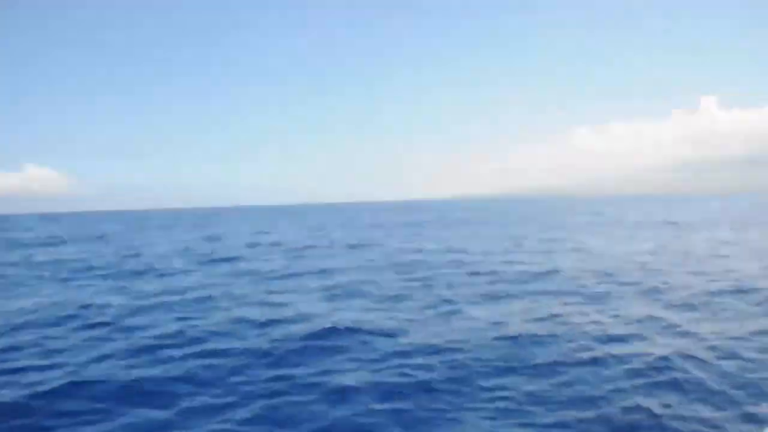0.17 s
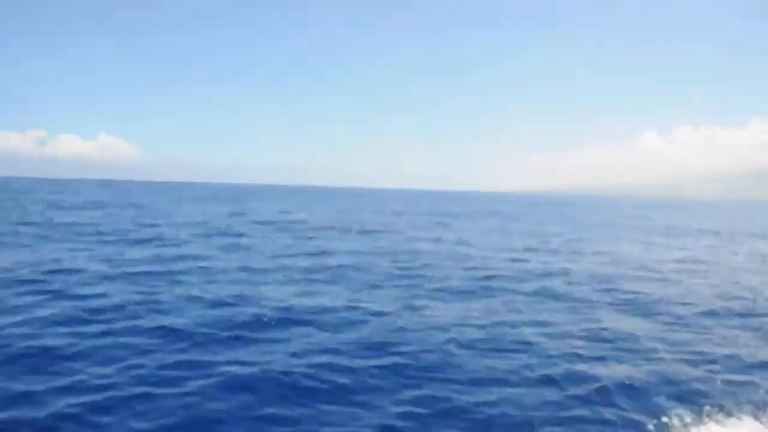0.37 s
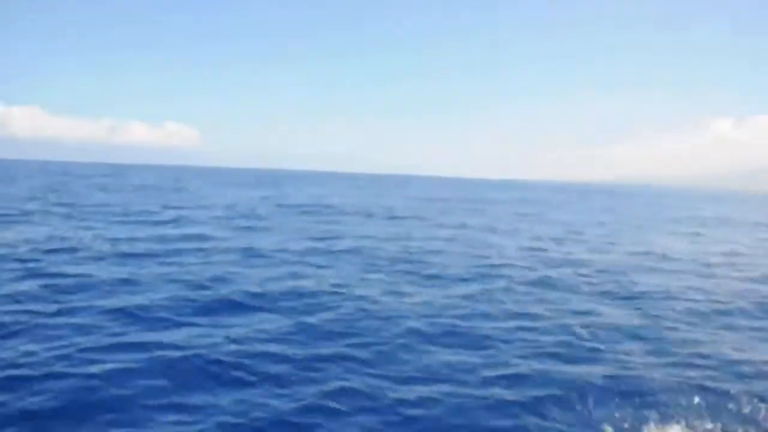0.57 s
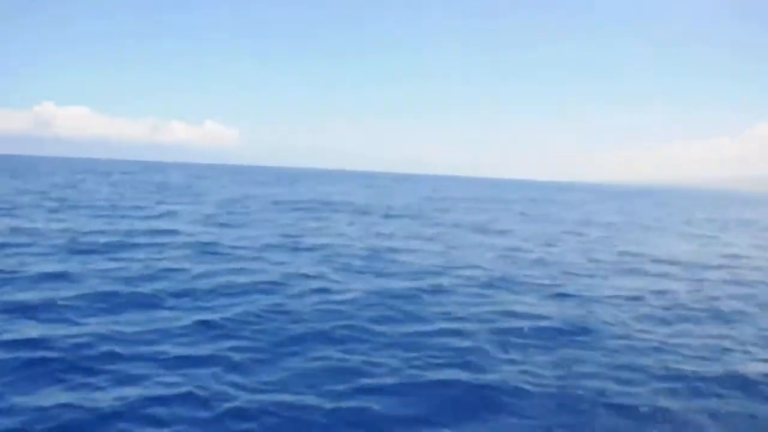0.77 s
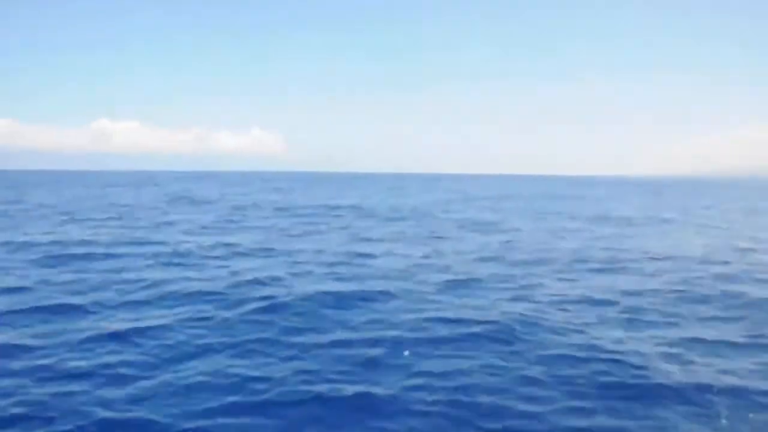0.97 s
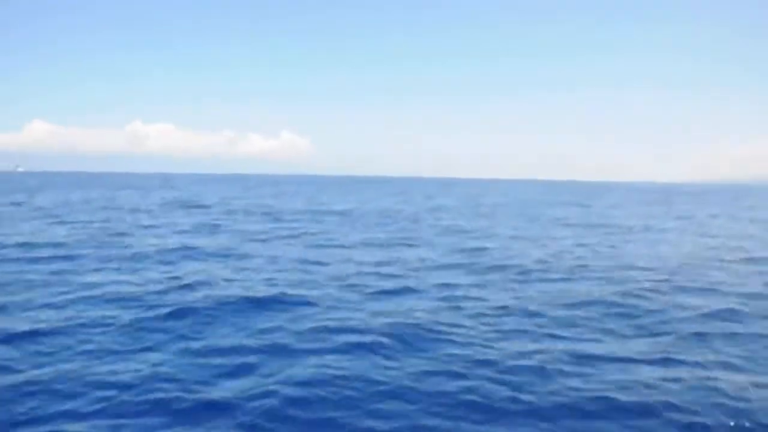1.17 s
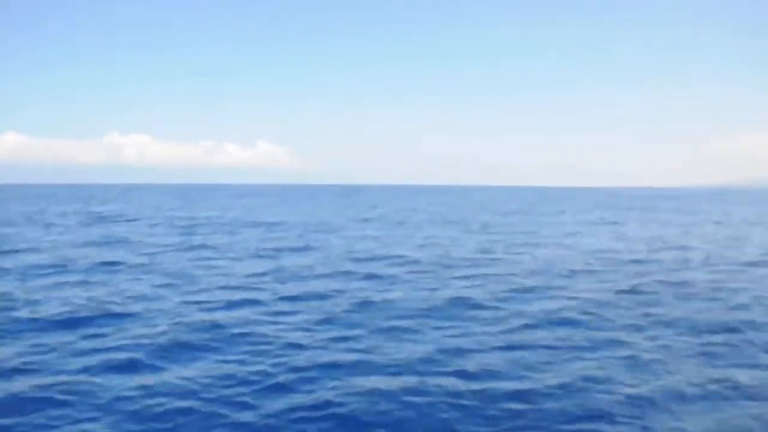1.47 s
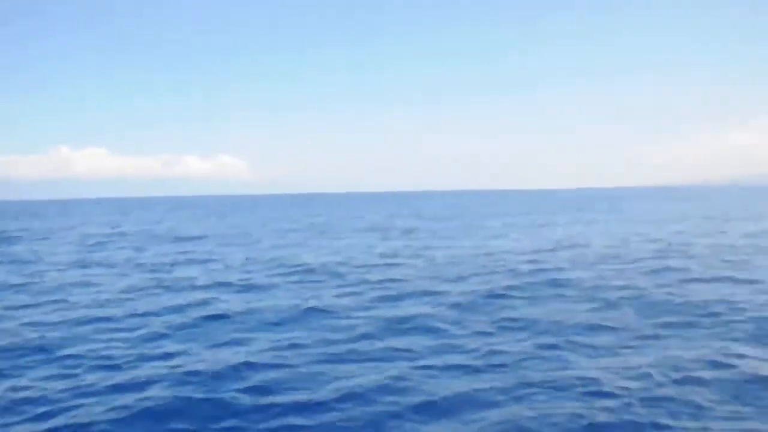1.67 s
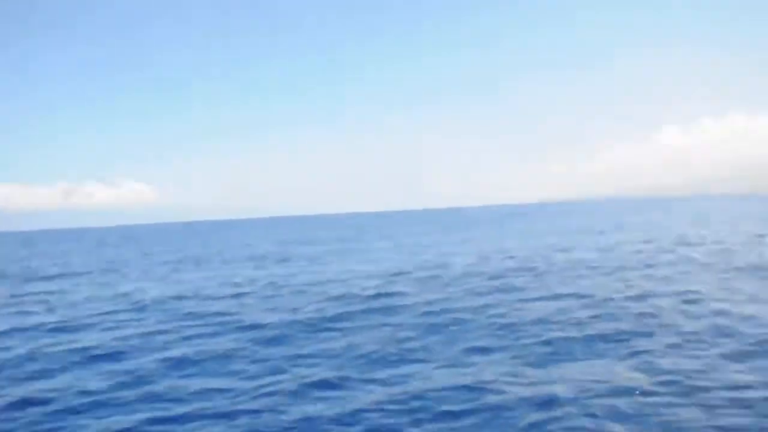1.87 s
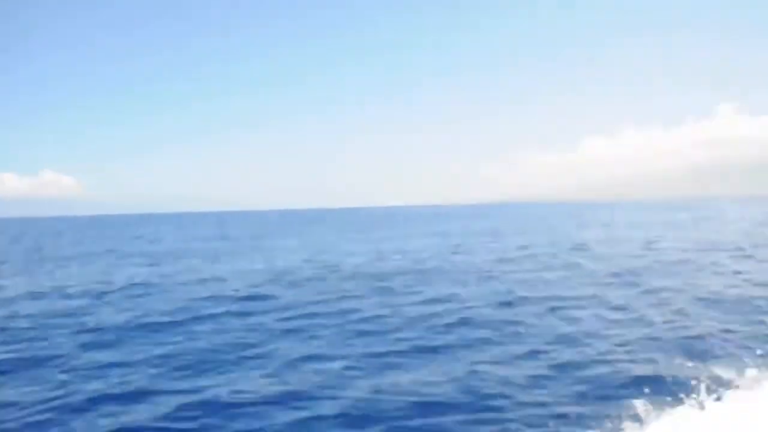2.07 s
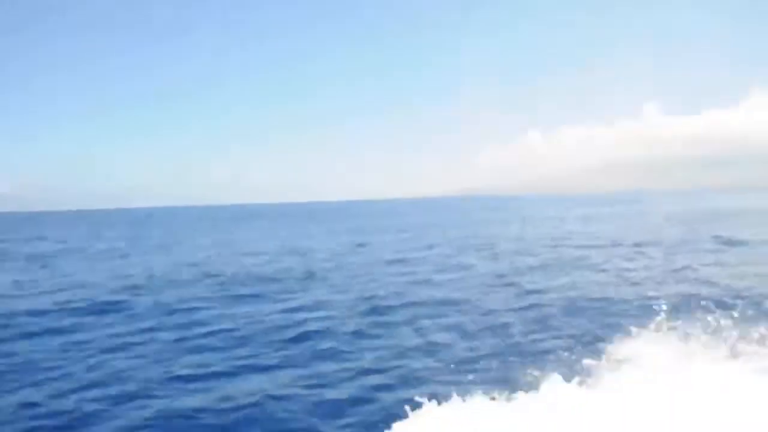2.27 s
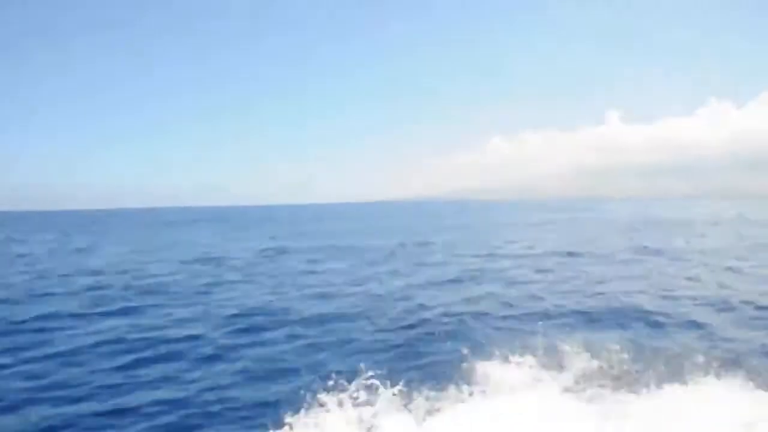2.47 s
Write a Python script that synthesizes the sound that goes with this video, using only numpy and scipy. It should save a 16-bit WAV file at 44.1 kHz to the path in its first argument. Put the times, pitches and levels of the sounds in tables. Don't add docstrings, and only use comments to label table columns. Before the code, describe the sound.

An outboard engine drones at steady fast throttle on a small boat, with spray hissing alongside

```python
import sys
import numpy as np
from scipy import signal
from scipy.fft import rfft, irfft
from scipy.io import wavfile
from scipy.ndimage import uniform_filter1d

SR = 44100
rng = np.random.default_rng(int(sys.argv[2]) if len(sys.argv) > 2 else 0)


def invert_db(x):
    u = np.asarray(x, float) / 20
    return 10 ** u


def master(y):
    cut = np.clip(np.atleast_2d(y).T, -1, 1)
    pcm = np.round(cut * 32767)
    wavfile.write(sys.argv[1], SR, pcm.astype(np.int16))


N = 115542

# start_s [s], cycle_rate_hz [Hz], load_db [dB], hull_ring_db [dB]
ENGINE_RIDE = [(0.0, 42.03, -31.5, -33), (0.04, 43.02, -17, -35.5), (0.2, 43.02, -16.5, -26),
               (0.36, 43.14, -18, -37), (0.38, 42.93, -20.5, -22.5), (1.33, 42.94, -21.5, -24),
               (1.48, 43.15, -17, -27.5), (1.56, 43.0, -14, -41), (1.58, 42.8, -24, -24.5),
               (1.76, 42.93, -16.5, -27.5), (1.82, 43.2, -20.5, -16.5), (1.85, 43.35, -11, -37),
               (1.88, 43.3, -15.5, -18), (2.06, 43.34, -21, -22), (2.11, 43.57, -13, -17.5),
               (2.3, 43.36, -26, -36), (2.33, 43.3, -20, -14), (2.62, 42.4, -18.5, -35)]
# cycle_multiple [x cycle rate], level_db [dB]
ENGINE_ORDERS = [(1, -29), (2, -12.5), (3, -13), (4, -27), (5, -4.5), (6, 3.5), (7, -9), (8, -5.5),
                 (9, -16.5), (10, -17), (11, -12), (12, -12), (13, -15), (14, -12), (15, -9), (16, -19.5),
                 (17, -31.5), (18, -12.5), (19, -25.5), (20, -14), (21, -34),
                 (5.5, -13), (7.5, -18), (8.5, -14), (20.4, -18.5), (21.1, -17), (25.9, -15.5), (28, -19.5),
               (34.1, -21.5), (35.2, -27)]
# pitch_hz [Hz], level_db [dB per Hz]
ROAR_COLOUR = [(40, -28), (76, -14), (160, -15), (235, 2.5), (280, -5.5), (340, -2), (420, -9), (700, -13),
               (1300, -44)]
# start_s [s], level_db [dB]
SPRAY_SWELLS = [
    (0.0, -28),
    (0.07, -24),
    (0.46, -24.5),
    (0.71, -21),
    (1.95, -23),
    (1.98, -25.5),
    (2.44, -22),
    (2.62, -24),
]
# pitch_hz [Hz], level_db [dB per Hz]
SPRAY_COLOUR = [(400, -19.5), (650, -1.5), (900, 0), (1500, -3.5), (2200, -11.5), (3500, -15),
                (4500, -22.5), (6200, -59)]
# pitch_hz [Hz], level_db [dB per Hz]
WIND_COLOUR = [(20, -22), (45, -17), (70, 3.5), (120, 17.5), (200, -6.5), (400, -49)]
# start_s [s], jump_height [signed, full scale 1]
STUTTER_JUMPS = [
    (.2490, .24),
    (.27066, -.5),
    (1.27063, .015),
    (1.29234, -.33),
    (2.29231, .13),
    (2.31399, -.15),
]

PIPE_ORDER, HULL_ORDER = 6, 5


def evened(x):
    return x / np.sqrt(np.mean(x ** 2) + 1e-20)


def curve(table, column):
    rows = np.array(table)
    return np.interp(np.arange(N) / SR, rows[:, 0], rows[:, column])


def drift(top_hz):
    hz = np.fft.rfftfreq(N, 1 / SR)
    spectrum = rfft(rng.standard_normal(N))
    return evened(irfft(spectrum * np.exp(-(hz / top_hz) ** 2) * (hz > 0), N))


def noise(colour, patchy_db):
    frames, hz = N // 256 + 5, np.fft.rfftfreq(1024, 1 / SR)
    real, imaginary, patches = rng.standard_normal((frames, 513, 3)).T
    patches = uniform_filter1d(patches, size=10, axis=0, mode="wrap")
    patches = evened(uniform_filter1d(patches, size=12, axis=1))
    colour_hz, colour_db = np.transpose(colour)
    shape_db = np.interp(np.log(hz + 1), np.log(colour_hz + 1), colour_db, left=-90, right=-90)
    spectra = (real + 1j * imaginary) * invert_db(shape_db[:, None] + patchy_db * patches)
    return evened(signal.istft(spectra, nperseg=1024, noverlap=768)[1][:N])


def engine_hum(turns, load_db):
    waver_db, waver_hz, jitter_hz = 3, 6.8, 0.792
    hull_db = curve(ENGINE_RIDE, 3)
    hull_db = hull_db - hull_db.mean()
    hum = np.zeros(N)
    for order, level_db in ENGINE_ORDERS:
        follow_db, freedom = 0.15 * load_db, 1
        if order == PIPE_ORDER:
            follow_db, freedom = load_db, 0.45
        elif order == HULL_ORDER:
            follow_db, freedom = hull_db, 0.45
        pitch_slip_hz = freedom * jitter_hz * np.sqrt(order) * drift(waver_hz)
        slip = np.cumsum(pitch_slip_hz) / SR + rng.random()
        swing_db = freedom * waver_db * 2 * np.tanh(0.5 * drift(waver_hz))
        tone = np.cos(2 * np.pi * (order * turns + slip))
        hum += invert_db(level_db + follow_db + swing_db) * tone
    return invert_db(-16.5) * evened(hum)


def throb(turns, depth):
    puff = np.exp(-(2 * turns % 1) / 0.7)
    puff = puff * (1 + 0.045 * np.sign(turns % 1 - 0.5))
    return 1 + depth * (uniform_filter1d(puff, size=40) / puff.mean() - 1)


def exhaust_roar(turns, load_db):
    level_db = -17.5 + 0.1 * load_db
    return invert_db(level_db) * throb(turns, depth=0.3) * noise(ROAR_COLOUR, patchy_db=0.5)


def spray(turns):
    level_db = curve(SPRAY_SWELLS, 1) + 0.5 * drift(40)
    return invert_db(level_db) * throb(turns, depth=0.15) * noise(SPRAY_COLOUR, patchy_db=0.5)


def wind():
    level_db = -34.5 + 0.8 * drift(11)
    return invert_db(level_db) * noise(WIND_COLOUR, patchy_db=2.5)


def scene():
    turns = np.cumsum(curve(ENGINE_RIDE, 1)) / SR
    load_db = curve(ENGINE_RIDE, 2)
    load_db = load_db - load_db.mean()
    engine = engine_hum(turns, load_db) + exhaust_roar(turns, load_db)
    return (engine + spray(turns) + wind())[None]


def faint_whine(t):
    return invert_db(-105) * drift(150) * np.sin(2 * np.pi * 11330 * t)


def stutters(t):
    jumps, fade_s = np.zeros(N), 0.002
    for start_s, height in STUTTER_JUMPS:
        side = np.sign(t - start_s + 1e-9)
        jumps += 0.5 * height * side * np.exp(-abs(t - start_s) / fade_s)
    return jumps


def low_pass(x):
    return signal.sosfilt(signal.butter(12, 15830, fs=SR, output="sos"), x)


def record(dry):
    t = np.arange(N) / SR
    low_cut = signal.butter(4, 54, "high", fs=SR, output="sos")
    band_limit = signal.firwin(201, 5600, window=("kaiser", 11), fs=SR)
    out = signal.sosfilt(low_cut, np.tanh(dry))
    out = signal.oaconvolve(out, band_limit[None], "same")
    out = out + faint_whine(t) + stutters(t)
    return low_pass(out)


dry = scene()
out = record(dry)
master(out)
```